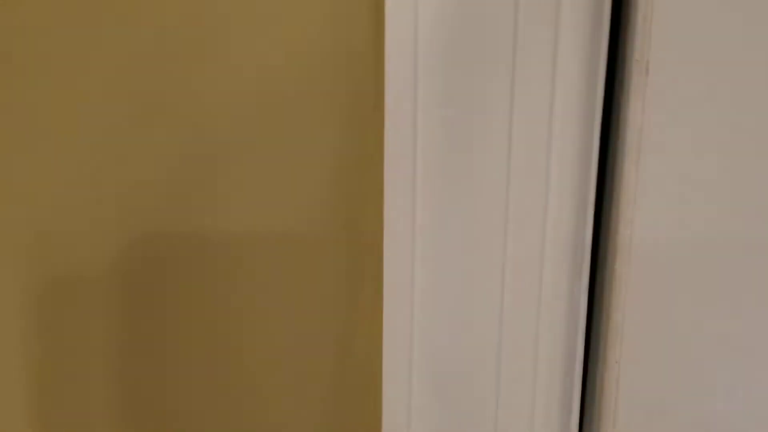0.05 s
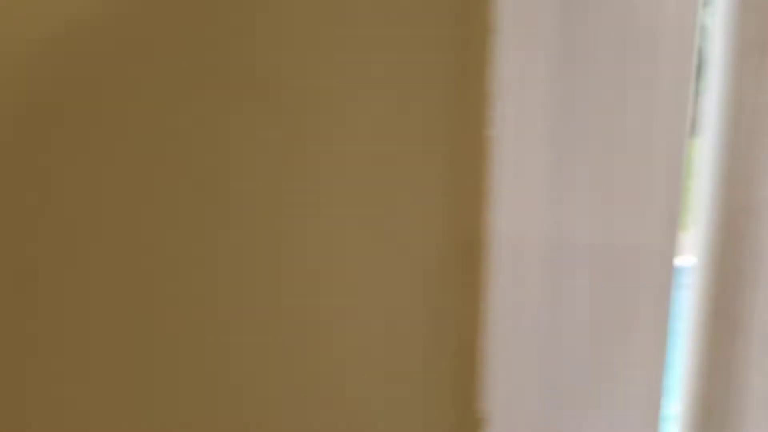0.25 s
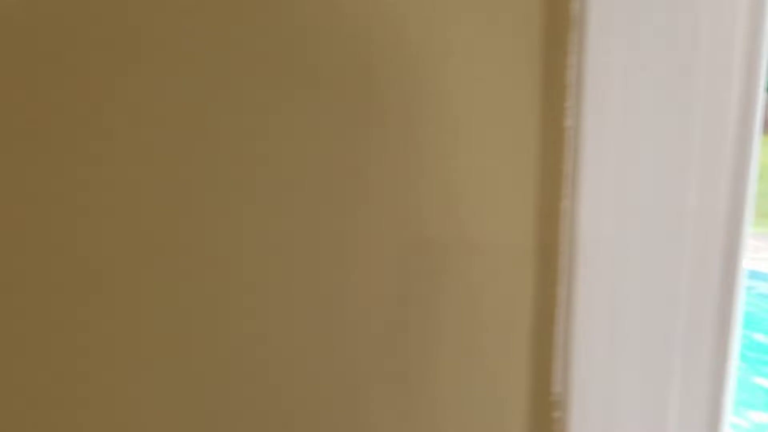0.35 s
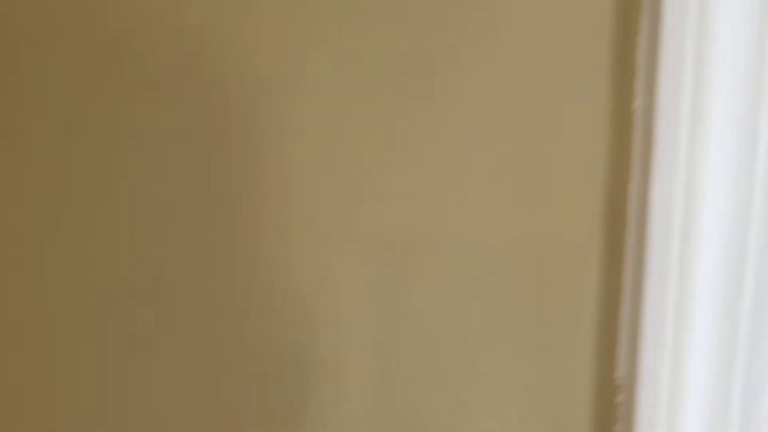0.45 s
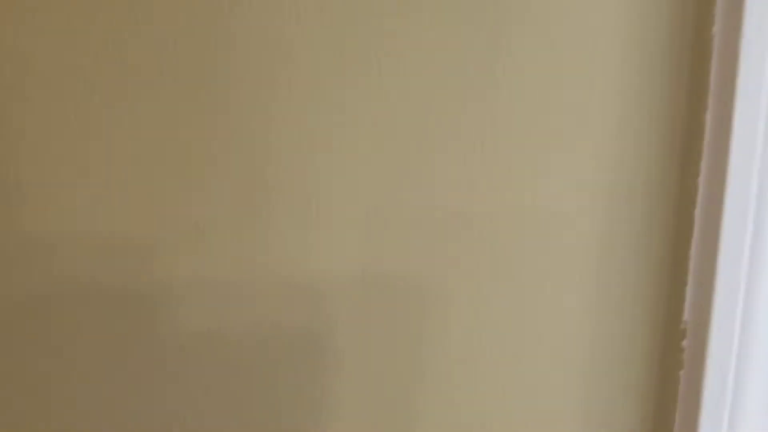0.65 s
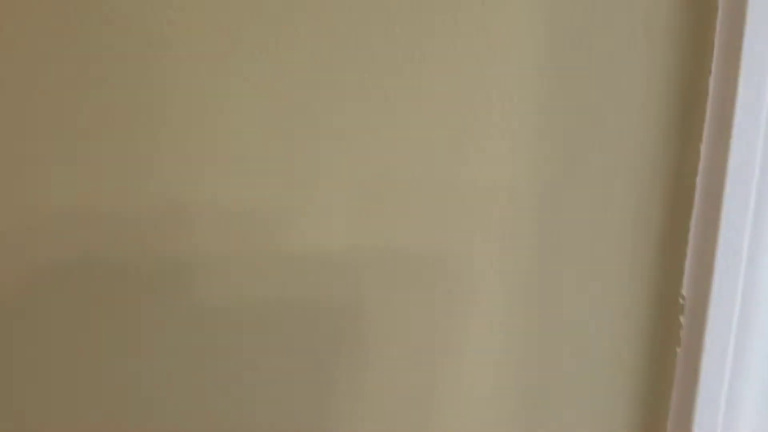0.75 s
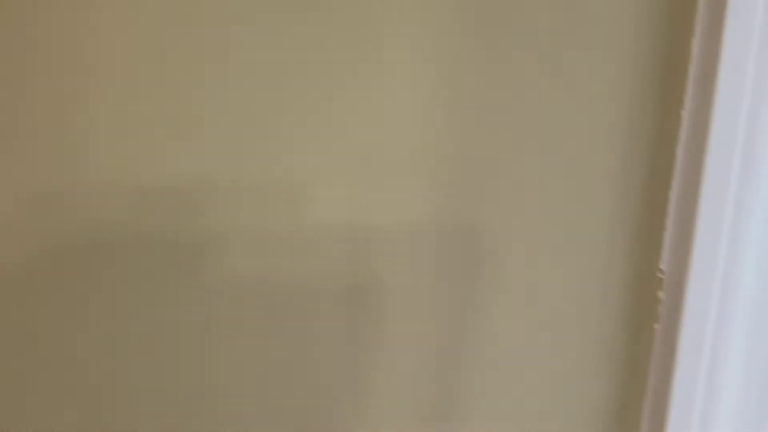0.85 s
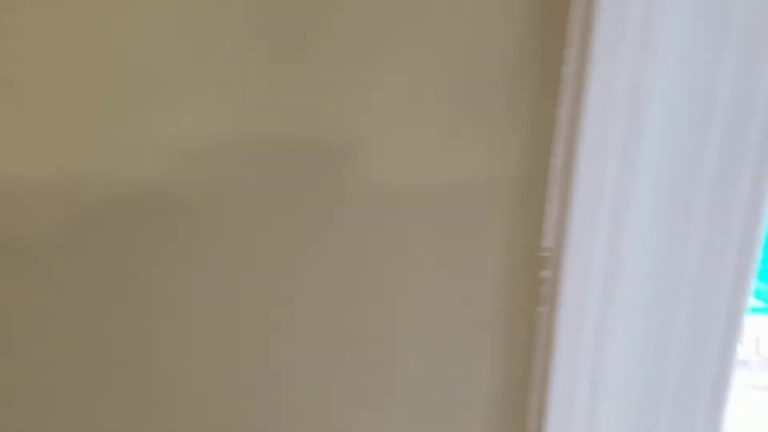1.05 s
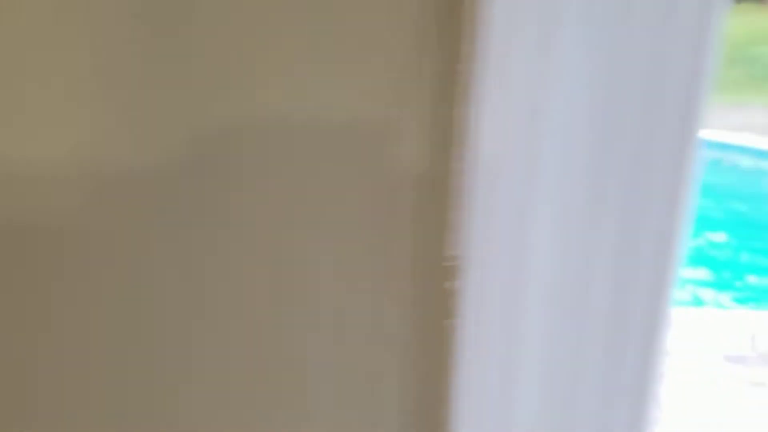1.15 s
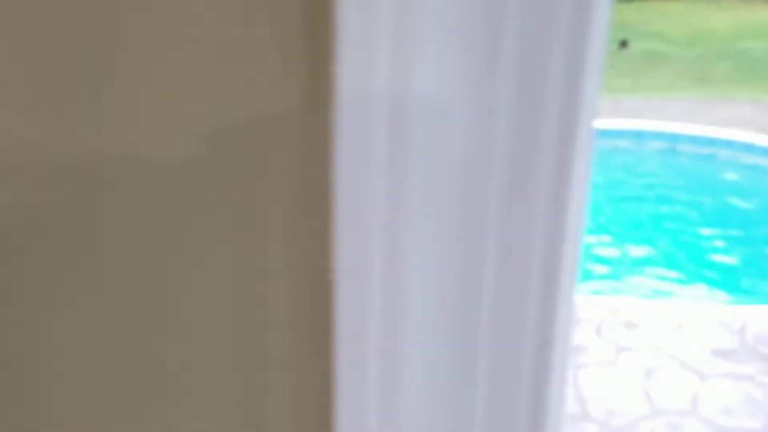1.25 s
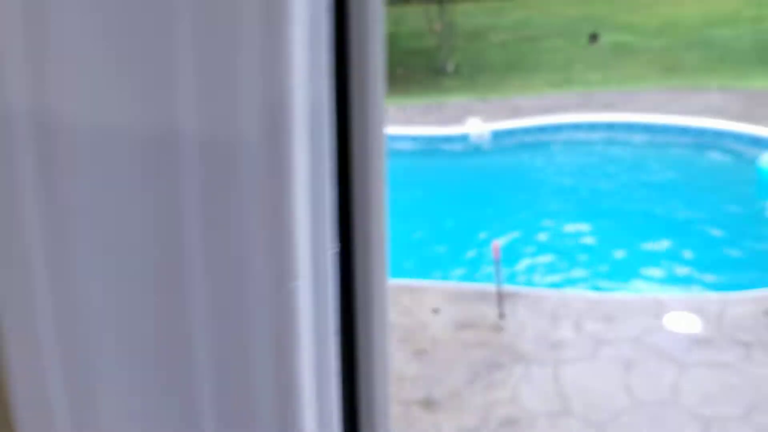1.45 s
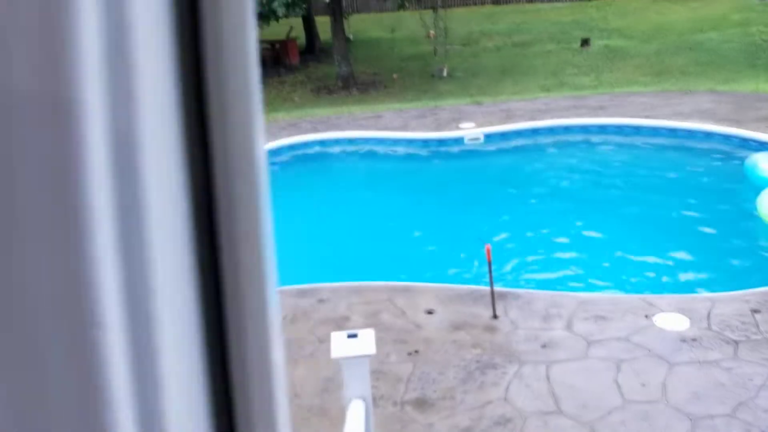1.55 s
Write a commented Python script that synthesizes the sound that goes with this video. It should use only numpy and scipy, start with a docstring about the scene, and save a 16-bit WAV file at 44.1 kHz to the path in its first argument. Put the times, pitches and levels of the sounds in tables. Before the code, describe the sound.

A sliding glass door is opened in a reverberant room, close and slightly right. Soft rubbing and small handle knocks come first, until 0.2 seconds. From 0.23 to 0.45 a gritty scrape squeals around 3 kHz over rumbling rollers, loudest near 0.33. A bright latch click follows at 0.51, then tiny ticks. Low hum continues; faint insects emerge after 1 second, with small clicks near 1.54.

```python
"""In a live room, a sliding glass door is pulled open beside a two-port microphone, nearer its right port.
The runner scrapes and squeals by stick and slip and rings the frame; the rollers rumble over small bumps;
handle, frame and latch click as struck resonances. Something rustles close by in grains of noise, and an
appliance hums in wavering tones under the room noise. After the door has stopped, insects fade in faintly
from outdoors as narrow bands of noise."""
import sys
import numpy as np
from scipy import signal
from scipy.fft import rfft, irfft
from scipy.io import wavfile

SR = 44100
rng = np.random.default_rng(int(sys.argv[2]) if len(sys.argv) > 2 else 0)


def file_out(sig):
    """Save sig as 16-bit WAV at sys.argv[1]."""
    # one column per channel
    cols = np.atleast_2d(sig).T
    # limit, then scale
    lim = np.clip(cols, -1, 1)
    pcm = np.round(lim * 32767).astype(np.int16)
    wavfile.write(sys.argv[1], SR, pcm)


N = 70560  # samples, 1.6 s


def undb(db):
    """Decibels to gain."""
    return 10 ** (np.asarray(db) / 20)


def unit(x):
    """Scale to rms 1."""
    return x / np.sqrt(np.mean(x ** 2) + 1e-20)


def clock():
    """Time of every sample in seconds."""
    return np.arange(N) / SR


def dying(t60):
    """Exponential decay that falls 60 dB in t60 seconds."""
    return np.exp(-np.log(1000) * clock() / t60)


def bump(at, spread):
    """Bell-shaped swell around a moment; spread is its standard deviation in seconds."""
    return np.exp(-0.5 * ((clock() - at) / spread) ** 2)


def swells(table):
    """Sum of bell-shaped swells from rows of time, level and spread."""
    return sum(undb(db) * bump(at, spread) for at, db, spread in table)


def curve(table, axis=1):
    """One column of a table, joined by straight lines in time."""
    rows = np.array(table)
    return np.interp(clock(), rows[:, 0], rows[:, axis])


def outline(points, size):
    """Spectral outline in dB for a transform of this size, joined over log frequency."""
    hz, db = np.array(points).T
    f = np.maximum(np.fft.rfftfreq(size, 1 / SR), 1)
    return np.interp(np.log(f), np.log(hz), db)


def colour(x, points):
    """Filter by a spectral outline, then scale to rms 1, so only its shape counts."""
    return unit(irfft(rfft(x) * undb(outline(points, N)), N))


def band(x, hz, width):
    """One resonance of a given width in Hz, gain 1 at its centre."""
    hz = min(hz, 0.45 * SR)
    return signal.lfilter(*signal.iirpeak(hz, hz / width, SR), x)


def walk(cutoff_hz):
    """Smooth random wander of rms 1: lowpassed noise without its first second."""
    lowpass = signal.butter(2, cutoff_hz, fs=SR, output="sos")
    return unit(signal.sosfilt(lowpass, rng.standard_normal(N + SR))[SR:])


def slips(rate, scatter_db):
    """Irregular tiny impacts of uneven size and random sign, rate per second on average."""
    hit = rng.random(N) < rate / SR
    size = np.clip(rng.standard_normal(N), -2, 2)
    return unit(hit * undb(scatter_db * size) * rng.choice([-1, 1], N))


# Force of the rubbing. Each row: time in seconds, level in dB before the scrape level.
RUB_FORCE = [(0.1, -43), (0.216, -32), (0.233, -10), (0.256, -11), (0.268, -6), (0.28, -2.5), (0.305, -0.5),
             (0.345, 4.5), (0.382, -8.5), (0.425, -18), (0.46, -19), (0.52, -55)]
# Tone of the scrape. Each row: frequency in Hz, relative level in dB per Hz.
SCRAPE_TONE = [(200, -20.5), (500, -24.5), (900, -17.5), (1350, -23), (1850, -3), (2400, -1.5), (2900, 0),
               (3400, -10), (3900, -17.5), (4700, -22.5), (7000, -48), (7600, -48), (15500, -44)]
# Hiss of the seal. Each row: frequency in Hz, relative level in dB per Hz.
HISS_TONE = [(2500, -31), (4000, -23), (4600, 5), (5300, -3.5), (6200, 2), (7500, -9.5), (8500, -4),
             (11000, -7), (15500, -12.5)]
# Modes of the door frame. Each row: frequency in Hz, peak level in dB before the frame level.
FRAME_MODES = [(1800, -5), (2230, -26), (2385, -25), (2618, -3), (2801, -5), (2938, 2.5), (3165, -9),
               (3352, 0)]
SCRAPE_DB, SLIPS_PER_S, SLIP_SCATTER_DB = -34, 1400, 4.5
STUTTER_DB, STUTTER_HZ = 3, 110
HISS_DB, HISS_PEAK_S, HISS_SPREAD_S = -42, 0.341, 0.034
FRAME_DB, FRAME_T60_S = -42, 0.15


def scrape():
    """The runner sticks and slips along the track and rings the frame; the seal hisses at full speed."""
    stutter = STUTTER_DB * np.clip(walk(STUTTER_HZ), -2, 1)
    rub = colour(slips(SLIPS_PER_S, SLIP_SCATTER_DB), SCRAPE_TONE) * undb(curve(RUB_FORCE) + stutter)
    width = np.log(1000) / np.pi / FRAME_T60_S  # Hz, gives each mode its decay time
    ring = 0
    for hz, db in FRAME_MODES:
        mode = band(rub, hz, width)
        ring = ring + undb(db) * mode / np.abs(mode).max()
    hiss = colour(slips(5000, scatter_db=1), HISS_TONE) * bump(HISS_PEAK_S, HISS_SPREAD_S)
    return undb(SCRAPE_DB) * rub + undb(FRAME_DB) * ring + undb(HISS_DB) * hiss


# Squeal of the runner. Each row: time in seconds, pitch in Hz, level in dB, roughness from 0 to 1.
SQUEAL_GLIDE = [(0.224, 3101, -85, .08), (0.233, 3244, -42, 0.12), (0.25, 3620, -40, 0.04),
                (0.268, 3520, -40, 0.07), (0.283, 3200, -40, 0.53), (0.305, 3060, -35, 0.29),
                (0.335, 2928, -31.5, 0.39), (0.365, 3350, -38, 0.46), (0.425, 3474, -44.5, 0.22),
                (0.445, 3200, -82, .5)]
SQUEAL_JITTER = 0.114  # rms share of the pitch at roughness 1
OVERTONE_DB, OVERTONE_FULL_DB = -12.5, -35.5  # overtone at its fullest, squeal level where it gets there


def squeal():
    """A gliding friction tone, ragged as the door gathers speed; its overtone grows with its strength."""
    t = clock()
    jitter = SQUEAL_JITTER * curve(SQUEAL_GLIDE, axis=3) * walk(333)
    hz = curve(SQUEAL_GLIDE) * (1 + jitter)
    phase = 2 * np.pi * np.cumsum(hz) / SR
    sounding = (t > SQUEAL_GLIDE[0][0]) * (t < SQUEAL_GLIDE[-1][0])
    gain = undb(curve(SQUEAL_GLIDE, axis=2) + 2.6 * walk(220)) * sounding
    overtone = undb(OVERTONE_DB) * np.minimum(gain / undb(OVERTONE_FULL_DB), 1) ** 2
    return gain * (np.sin(phase) + overtone * np.sin(2 * phase))


# The runner catches twice as it starts. Each row: centre in seconds, level in dB, spread in seconds.
CATCH_SWELLS = [(0.236, -38, .007), (0.279, -32, 0.0089)]
# Tone of the grinding. Each row: frequency in Hz, relative level in dB per Hz.
GRIND_TONE = [(300, -26.5), (1000, -18), (1450, -7), (1850, 2), (2600, -2.5), (3100, -12), (4400, -14),
              (6000, -25.5), (15000, -30.5)]


def catches():
    """Two short, lower grinds of stick and slip while the door breaks free."""
    return colour(slips(SLIPS_PER_S, SLIP_SCATTER_DB), GRIND_TONE) * swells(CATCH_SWELLS)


# Strength of the rolling. Each row: time in seconds, level in dB.
ROLL_LEVEL = [(0, -50.5), (0.03, -57), (0.058, -60), (0.08, -59), (0.115, -55.5), (0.18, -57), (0.22, -57),
              (0.255, -51.5), (0.282, -43), (0.34, -51), (0.41, -62), (0.447, -52.5), (0.475, -89),
              (0.6, -76.5)]
# Tone of the rollers on the track. Each row: frequency in Hz, relative level in dB per Hz.
ROLLER_TONE = [(40, -41), (90, 3), (150, -5.5), (230, -3.5), (420, -3), (560, -5), (700, -11), (950, -8.5),
               (1400, -18.5), (3000, -15), (8000, -30)]


def rollers():
    """Small bumps of the track shake the heavy pane."""
    return colour(slips(1500, scatter_db=5), ROLLER_TONE) * undb(curve(ROLL_LEVEL))


# Tone of the hand sliding on the handle. Each row: frequency in Hz, relative level in dB per Hz.
GRIP_TONE = [(150, 7.5), (300, -37), (900, -3.5), (1600, 0.5), (2300, -38), (4000, -10), (5800, -8),
             (7500, -21), (15000, -28)]
GRIP_DB, GRIP_T60_S = -49, 0.17  # level at the start, time to fall 60 dB


def grip():
    """A dull rub of the hand on the handle that dies away."""
    return undb(GRIP_DB) * colour(slips(2100, scatter_db=3), GRIP_TONE) * dying(GRIP_T60_S)


def click(start, db, hz, decay, width, crack, snap=0):
    """A sharp push and brief chatter, 30 dB down after decay seconds, through a broad resonance."""
    push = rng.standard_normal(N) * dying(2 * decay) + 1e-18
    push[0] = 4
    body = band(push, hz, width * hz)
    # crack passes the skirts of the resonance, snap is the bare contact
    hit = band(body, hz, width * hz) + crack * body + snap * np.diff(push, prepend=0)
    delayed = np.pad(hit, (int(max(start, 0) * SR), 0))[:N]
    return undb(db) * delayed / np.abs(hit).max()


# Knocks of handle and frame, and at 0.273 s a sharp catch of the runner. Each row: start in seconds, # peak
# level in dB, ring in Hz, decay (fall of 30 dB) in seconds, level sent into the room in dB against the direct
# sound.
KNOCK_HITS = [(0.047, -43.5, 288, 0.031, -3), (0.059, -43.5, 3200, 0.0044, -3),
              (0.122, -43.5, 2700, 0.0088, 2.5), (0.191, -42, 2500, 0.013, 1),
              (0.206, -44.5, 438, 0.098, 0.5), (0.224, -41.5, 4300, 0.011, -19),
              (0.273, -30, 2380, 0.013, -10), (0.279, -49, 144, 0.046, -2), (0.3205, -27, 3040, 0.0042, -5),
              (0.3775, -33, 2800, 0.011, -7), (0.449, -41.5, 1300, 0.0057, 0),
              (1.5302, -42, 3100, 0.0066, -11), (1.547, -41, 3330, 0.0034, -5.5),
              (1.548, -56, 830, 0.088, -10), (1.551, -55, 1650, 0.026, 1.5), (1.557, -62, 96, 0.029, -29)]


def knocks():
    """Handle and frame knock and the runner catches once; the nearer contacts send less into the room."""
    direct, sent = 0, 0
    for start, db, hz, decay, room_db in KNOCK_HITS:
        hit = click(start, db, hz, decay, width=0.45, crack=0)
        direct = direct + hit
        sent = sent + undb(room_db) * hit
    return at_ports(direct) + room(sent)


# Small metal ticks of the latch. Each row: start in seconds, peak level in dB, ring in Hz,
# decay (fall of 30 dB) in seconds.
LATCH_TICKS = [(0.5146, -29.5, 10060, .006), (0.590, -51, 13500, 0.0018), (0.602, -59, 14100, .003),
               (0.62, -52, 13500, .005), (0.623, -52, 9350, .006), (0.641, -51, 13700, .005),
               (0.6838, -56.5, 8400, 0.0045), (0.706, -54, 13300, .005), (0.7438, -50, 15200, 0.0027),
               (1.126, -56, 5630, 0.035)]


def ticks():
    """Tiny bright contacts of the loose latch."""
    return sum(click(*row, width=0.12, crack=0.63, snap=0.06) for row in LATCH_TICKS)


# Rustles close to the microphone. Each row: centre in seconds, level in dB, spread in seconds.
RUSTLE_SWELLS = [(0.01, -61, 0.054), (0.115, -60, 0.039), (0.21, -54.5, .014), (0.614, -70, 0.17),
                 (1.262, -65.5, .04)]
# Tone of the rustling. Each row: frequency in Hz, relative level in dB per Hz.
RUSTLE_TONE = [(500, -13), (1500, 11.5), (5500, 6.5), (7500, 0.5), (10000, 10.5), (13000, 10), (15500, 1.5)]


def rustle():
    """Soft, fine-grained brushing close to the microphone."""
    return colour(slips(5400, scatter_db=8), RUSTLE_TONE) * swells(RUSTLE_SWELLS)


DIFFUSE_HZ, BASS_SPREAD = 850, 0.17  # scale of the widening, share of side signal in the deepest bass


def diffuse():
    """Noise from all sides: nearly alike at both ports in the bass, unrelated in the treble."""
    mid, side = rng.standard_normal((2, N))
    spread = np.minimum(BASS_SPREAD + np.fft.rfftfreq(N, 1 / SR) / DIFFUSE_HZ, 1)
    return mid + irfft(rfft(side) * spread, N) * np.array([[1], [-1]])


def pan(db):
    """Left and right gains for a level difference, left minus right."""
    return undb(np.array([[db], [-db]]) / 2)


def tilt_sides(x, points):
    """Lean a pair of channels to one side by frequency."""
    lean = outline(points, 2 * N)
    return irfft(rfft(x, 2 * N) * undb(np.array([lean, -lean]) / 2))[:, :N]


# Tone of the room noise. Each row: frequency in Hz, relative level in dB per Hz.
AMBIENCE_TONE = [(15, -32), (25, -9), (53, -1), (91, -5.5), (119, 2), (152, -4), (178, -3), (204, -7),
                 (289, -13.5), (368, -20), (445, -21), (722, -27.5), (1660, -38), (2120, -36), (2920, -35),
                 (5730, -35), (7500, -41), (8580, -39), (15500, -38.5)]
# Side of the room noise. Each row: frequency in Hz, left minus right in dB.
AMBIENCE_LEAN = [(400, 0), (1500, -2), (5000, -5.5), (14000, 2)]
# Hum of an appliance. Each row: mean frequency in Hz, middle level in dB.
HUM_TONES = [(119, -69.5), (178, -68)]
# Insects outdoors. Each row: centre in Hz, nominal width in Hz, level in dB, middle of fade-in in seconds.
INSECT_BANDS = [(2790, 520, -73, 1.232), (8540, 900, -82.5, 1)]
AMBIENCE_DB, HUM_WAVER_DB = -59, 3
FADE_IN_S, OUTDOOR_PAN_DB = 0.15, -8.5  # time scale of the fade-in, left minus right


def background():
    """Room noise, a hum wavering in pitch and level, and insects that fade in after the door has stopped."""
    t = clock()
    out = undb(AMBIENCE_DB) * tilt_sides(colour(diffuse(), AMBIENCE_TONE), AMBIENCE_LEAN)
    for hz, db in HUM_TONES:
        level = undb(db + HUM_WAVER_DB * walk(14.2))
        phase = 2 * np.pi * np.cumsum(hz * (1 + 0.0341 * walk(25.4))) / SR
        out = out + level * np.sqrt(2) * np.sin(phase)
    for hz, width, db, middle in INSECT_BANDS:
        # two resonances in a row give steep sides
        chorus = unit(band(band(diffuse(), hz, 1.28 * width), hz, 0.84 * width))
        fade = (1 + np.tanh((t - middle) / FADE_IN_S)) / 2
        out = out + chorus * undb(db + 2 * walk(21)) * fade * pan(OUTDOOR_PAN_DB)
    return out


PORT_LAG_S, SQUEAL_LAG_S = 0.00014, 0.00007  # delay of the left port
DOOR_PAN_DB, ROOM_PAN_DB = -3, 1.5  # left minus right


def at_ports(x, lag=PORT_LAG_S):
    """Direct sound reaches the right port first and stronger."""
    f = np.fft.rfftfreq(2 * N, 1 / SR)
    late = irfft(rfft(x, 2 * N) * np.exp(-2j * np.pi * f * lag))[:N]
    return np.array([late, x]) * pan(DOOR_PAN_DB)


# Decay of the room. Each row: band edges in Hz, time to fall 60 dB in seconds.
ROOM_DECAY = (((20, 1200), 0.77), ((1200, 7000), 0.58), ((7000, 18000), 0.48))
ROOM_BUILD_S = 0.0027


def room(x):
    """A diffuse tail with its own decay in bass, middle and treble."""
    tail = 0
    for edges, t60 in ROOM_DECAY:
        bandpass = signal.butter(3, edges, "band", fs=SR, output="sos")
        tail = tail + signal.sosfilt(bandpass, diffuse()) * dying(t60)
    tail = unit(tail * (1 - np.exp(-clock() / ROOM_BUILD_S))) / np.sqrt(N)
    return signal.fftconvolve(x[None], tail, axes=1)[:, :N] * pan(ROOM_PAN_DB)


def in_room(x, room_db, lag=PORT_LAG_S):
    """Direct sound plus tail, scaled to keep their power in balance."""
    return (at_ports(x, lag) + undb(room_db) * room(x)) / np.hypot(1, undb(room_db))


def scene():
    """Door, fittings and surroundings at the two ports; room_db is the tail against the direct sound."""
    door = in_room(scrape(), room_db=-2)
    door = door + in_room(squeal() + catches(), room_db=-3.5, lag=SQUEAL_LAG_S)
    door = door + in_room(rollers() + grip(), room_db=0.5)
    fittings = knocks() + in_room(ticks(), room_db=-26)
    return door + fittings + in_room(rustle(), room_db=-2.5) + background()


# Shading of the left port. Each row: frequency in Hz, left minus right in dB.
LEFT_SHADE = [(150, 0), (400, -5), (800, -6), (2500, -6), (6000, -8.5), (14000, -6)]
TOP_HZ = 15800


def record(dry):
    """The left port hears less above the bass; the recorder cuts the top."""
    lowpass = signal.ellip(10, 0.2, 70, TOP_HZ, fs=SR, output="sos")
    return signal.sosfilt(lowpass, tilt_sides(dry, LEFT_SHADE))


dry = scene()
out = record(dry)
file_out(out)
```